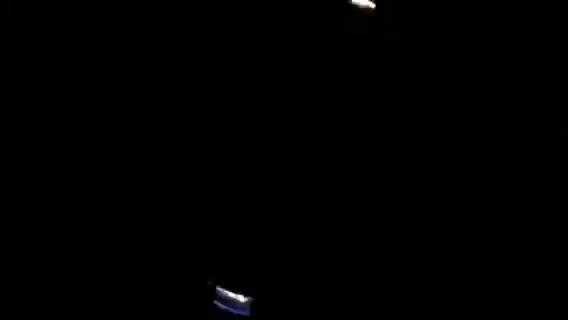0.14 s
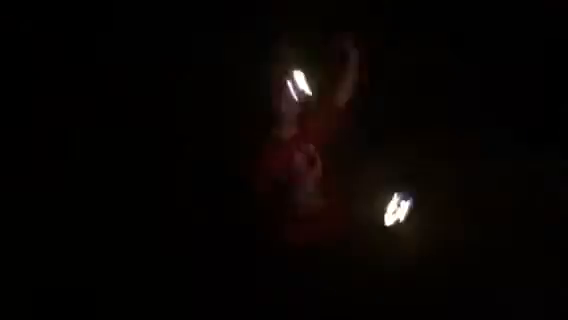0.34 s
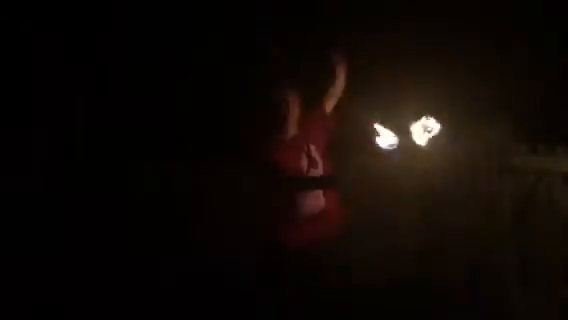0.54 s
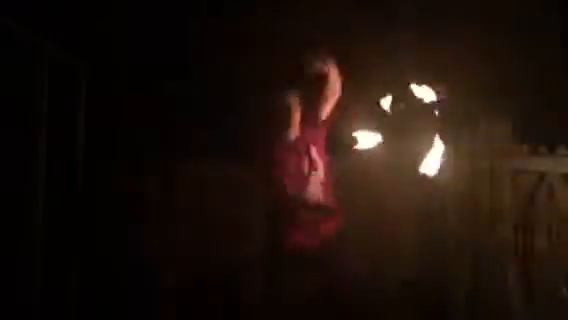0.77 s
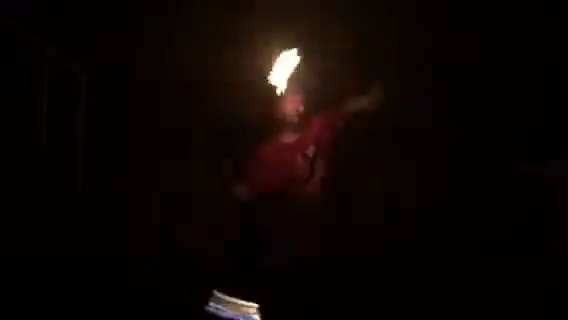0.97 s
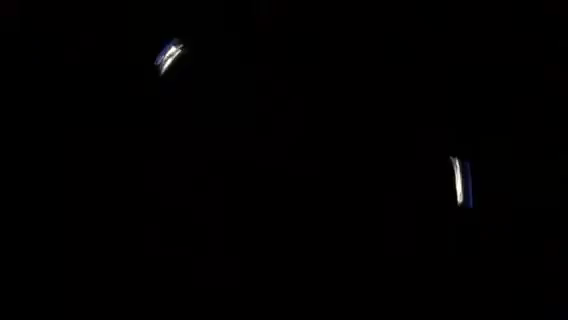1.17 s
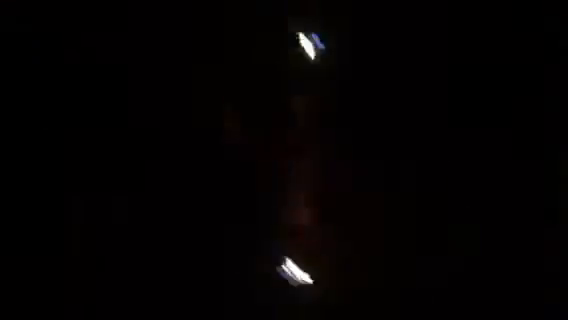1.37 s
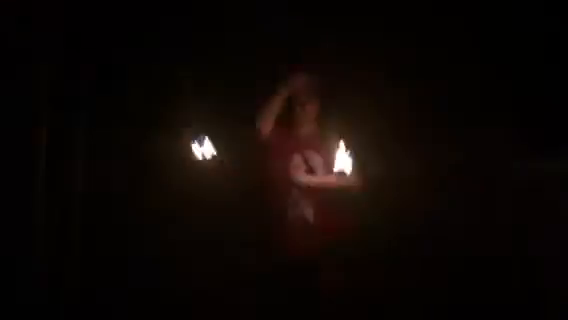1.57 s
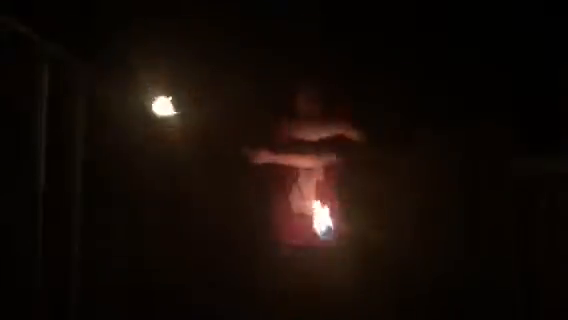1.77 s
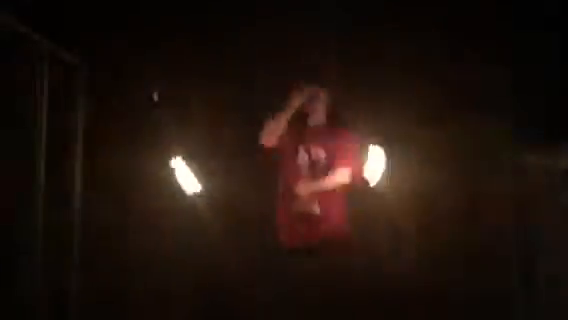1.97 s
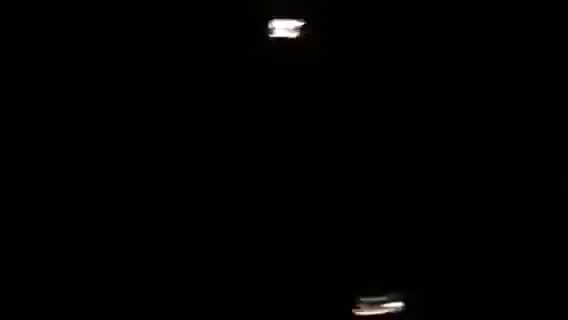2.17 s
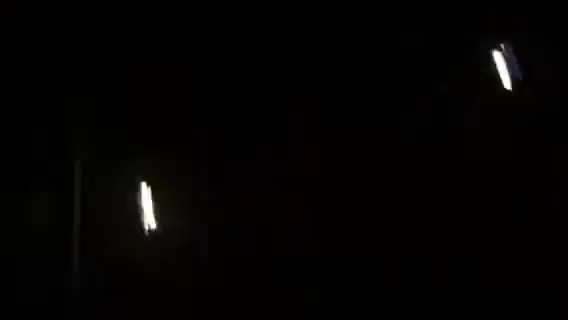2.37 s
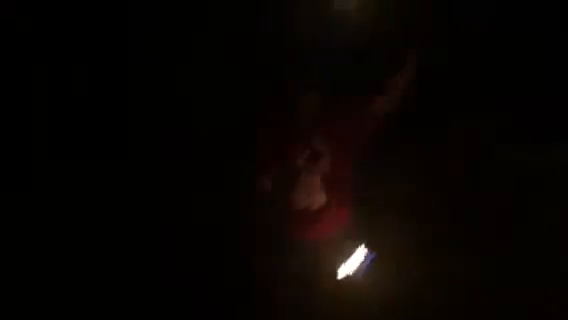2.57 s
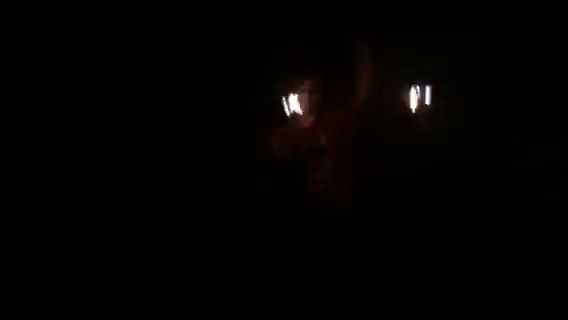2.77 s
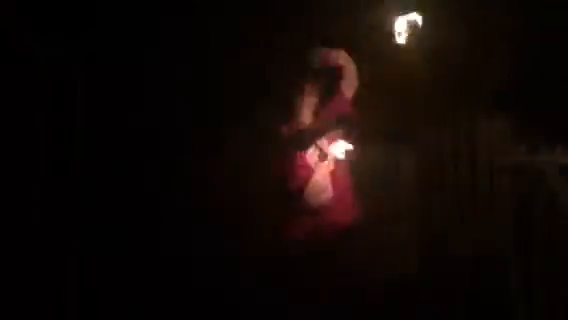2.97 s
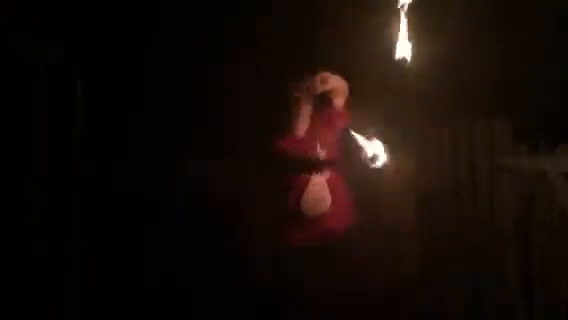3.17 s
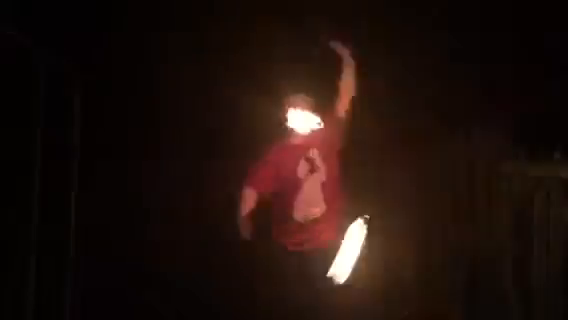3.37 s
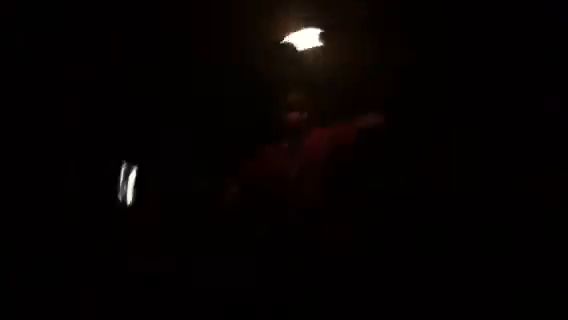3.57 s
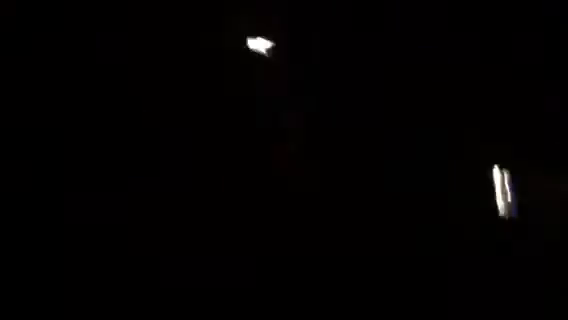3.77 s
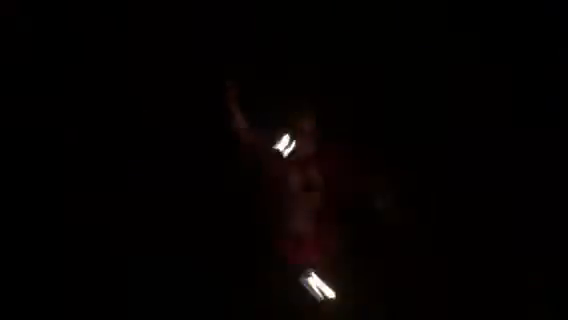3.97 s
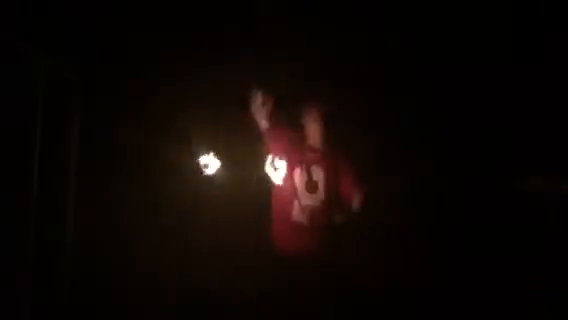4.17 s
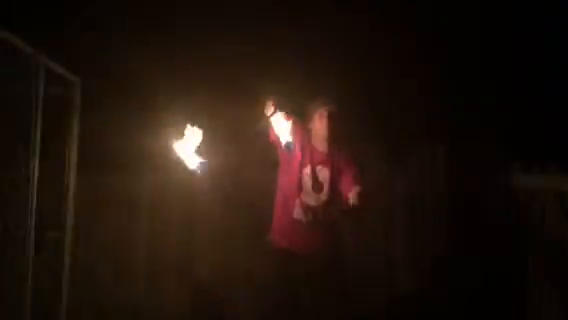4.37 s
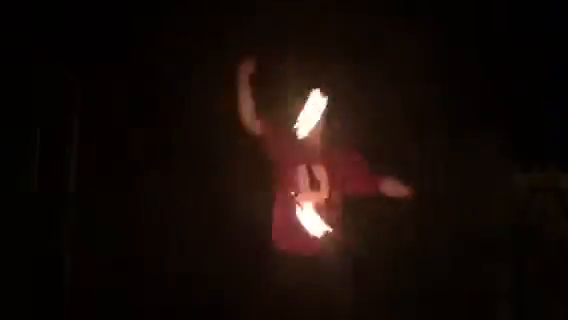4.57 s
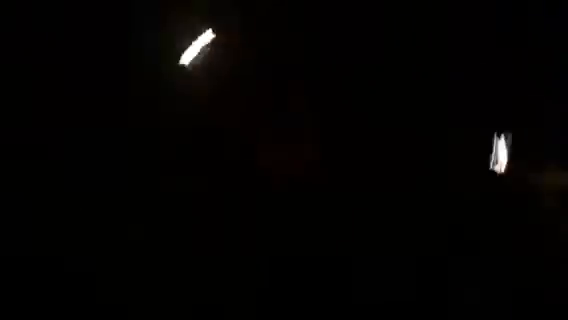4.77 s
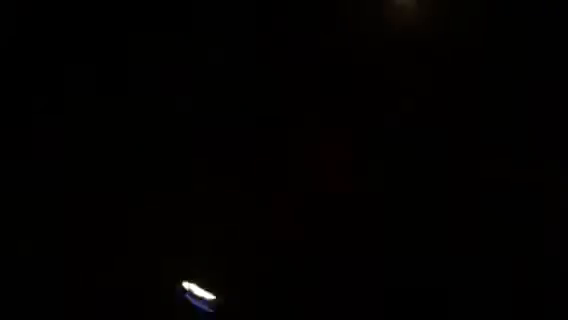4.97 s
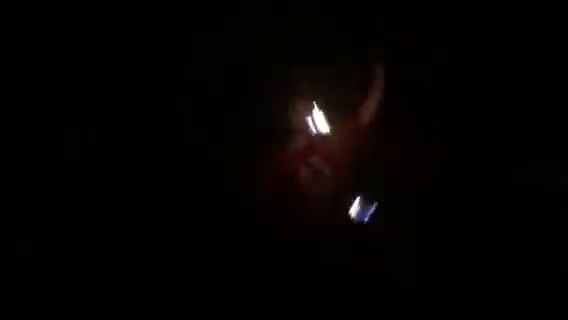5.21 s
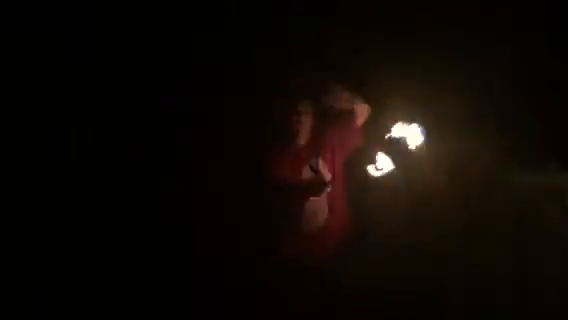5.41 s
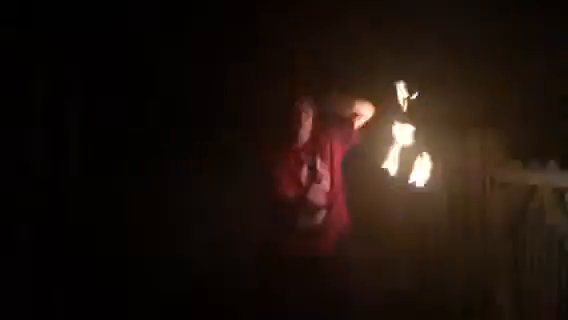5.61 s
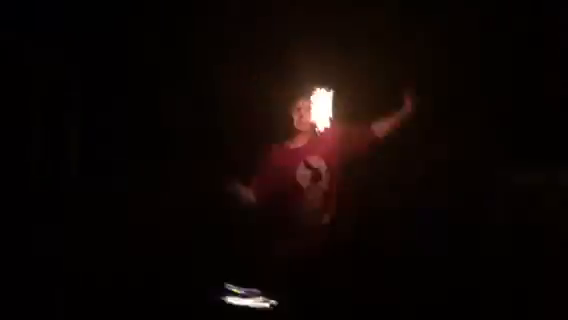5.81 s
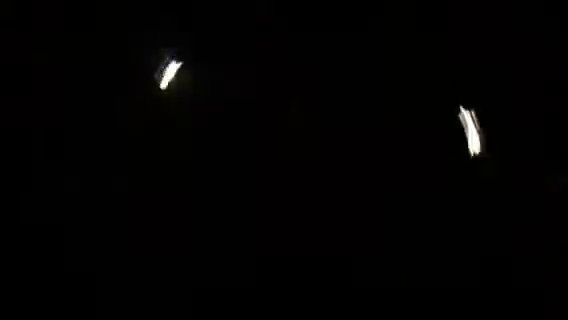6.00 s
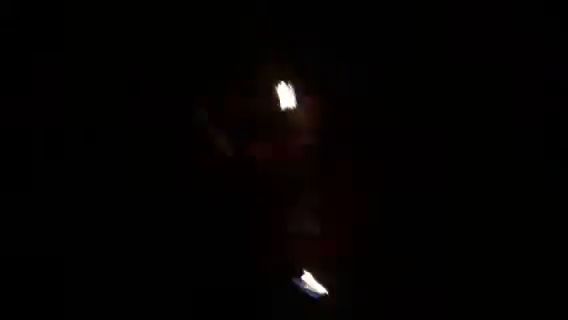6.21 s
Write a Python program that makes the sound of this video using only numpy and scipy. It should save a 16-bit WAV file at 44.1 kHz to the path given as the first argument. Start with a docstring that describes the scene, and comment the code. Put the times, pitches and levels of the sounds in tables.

```python
"""Two burning wicks on chains are swung through still night air a few steps from a small microphone.
The torn flames roar louder in each swing while their brightness keeps shifting; slow flames flutter and
puff. The ground throws each roar back a few milliseconds late, and as this delay wanders it sweeps a hollow
colour through it. Big swirls of air thump, chain links tick and chink, and a swivel squeaks once."""
import sys
import numpy as np
from scipy import signal
from scipy.fft import rfft, irfft
from scipy.io import wavfile
from scipy.ndimage import uniform_filter1d

SR = 44100
rng = np.random.default_rng(int(sys.argv[2]) if len(sys.argv) > 2 else 0)


def wrap_up_sound(samples):
    """Save the sound to the file named by the first command line argument, as 16-bit audio."""
    columns = np.atleast_2d(samples).T
    # keep every value between -1 and 1, then stretch to whole-number steps
    tamed = np.clip(columns, -1, 1)
    steps = np.round(tamed * 32767).astype(np.int16)
    wavfile.write(sys.argv[1], SR, steps)


N = 275533


def gain_of(db):
    """Turn decibels into a factor to multiply by."""
    return 10 ** (np.asarray(db) / 20)


def evened(x):
    """Scale x to an average size (rms) of 1."""
    return x / np.sqrt(np.mean(x ** 2) + 1e-20)


def level_at(points, hz):
    """Read a curve of levels at the frequencies hz."""
    f, db = np.transpose(points)
    return np.interp(np.log(hz + 1), np.log(f + 1), db)


def add(mix, s, sound):
    """Mix a sound in, starting at s seconds."""
    part = mix[round(s * SR):][:len(sound)]
    part += sound[:len(part)]


def grid(size):
    """Frequencies (column) and times (row) of sound cut into frames of size samples."""
    return np.fft.rfftfreq(size, 1 / SR)[:, None], np.arange(4 * N // size + 5) * size / 4 / SR


def blotches(size, bins, frames):
    """Random patches on the grid, smooth over some frequency bins and time frames."""
    hz, t = grid(size)
    raw = rng.standard_normal((len(t), len(hz))).T
    return evened(uniform_filter1d(uniform_filter1d(raw, bins, 0), frames, 1))


def noise(gain, size):
    """Noise whose strength follows gain at each point of the grid."""
    real, imag = rng.standard_normal(gain.shape[::-1] + (2,)).T
    return signal.istft(gain * (real + 1j * imag), nperseg=size, noverlap=3 * size // 4)[1][:N]


def shaped(points, hz, band_hz=(0, SR)):
    """Gains along a curve, scaled so the power within the band sums to 1."""
    gain = gain_of(level_at(points, hz))
    in_band = (hz > band_hz[0]) & (hz < band_hz[1])
    return gain / np.sqrt(np.sum(gain[in_band] ** 2))


def wander(per_s, t):
    """A smooth random drift that swings up to per_s times a second."""
    rates = np.geomspace(per_s / 8, per_s, num=16)[:, None]
    waves = np.sin(2 * np.pi * (rates * t + rng.random(rates.shape)))
    return evened(np.sum(waves / np.sqrt(rates), axis=0))


def swell(length):
    """Times and loudness of a quick rise and slower fall, lasting four times length."""
    t = np.arange(round(4 * length * SR)) / SR
    return t, 1.77 * t / length * np.exp(1 - 2.62 * t / length)


def flicker(per_s):
    """The flame tears and heals at random, from 3 to about per_s times a second."""
    band = signal.butter(2, [3, per_s], "bandpass", fs=SR, output="sos")
    return evened(signal.sosfilt(band, rng.standard_normal(N)))


def flame_db(quality, t):
    """How strong one quality of the flame is at times t, as swings and lulls take turns."""
    # the fast flame, one list a swing: t/s, roar/dB, brightness/dB, hum/dB, hiss/dB (all relative)
    swings = [
        [(0.0, -49, -3.5, -4, -60), (0.026, -43.5, -3.5, 3.5, -60.5), (0.204, -56.5, 0, 1.5, -66),
         (0.244, -56.5, 0.5, 5, -66), (0.32, -50.5, -6, -4, -83), (0.35, -45.5, -7, -2, -83),
         (0.414, -58, -3.5, 6.5, -80), (0.444, -53, -11, 1, -87), (0.46, -52, -8.5, 6, -72),
         (0.57, -61, -11.5, 2, -85)],
        [(0.88, -63, -7.5, -5, -73), (0.936, -47.5, -9, -6, -64), (1.096, -46.5, -4.5, 2.5, -61),
         (1.118, -50, -1, 6, -65.5), (1.396, -50.5, -5.5, -2, -65.5), (1.476, -56, -4, 9, -70),
         (1.588, -42.5, -14, -13, -74), (1.644, -58, -4.5, 8, -75), (1.846, -60, -11.5, 3, -82),
         (1.89, -64, -18, -18, -90)],
        [(2.08, -62, -7, 3.5, -78), (2.202, -45, -7, -2, -65), (2.252, -50, -3, 7.5, -61.5),
         (2.394, -50, -3, 2, -61), (2.55, -47, -7, -11, -64), (2.684, -56, -3, 11.5, -71.5),
         (2.734, -49.5, -10, -6, -77), (2.906, -64, -2, 20.5, -71), (2.962, -67.5, -1.5, 19.5, -62.5),
         (3.04, -54.5, -14, -3.5, -65)],
        [(3.42, -51, -10, 1, -79), (3.442, -46.5, -10.5, -2, -67.5), (3.53, -51, -1.5, 2, -63),
         (3.562, -43.5, -5.5, 0.5, -57.5), (3.598, -57, 3, 10, -64), (3.786, -49, -7, 5.5, -76),
         (3.906, -53, -2.5, -1.5, -64), (4.068, -52, -5, 5.5, -70.5), (4.17, -48, -10, -7, -72.5),
         (4.25, -53.5, -19, -10, -79)],
        [(4.6, -60.5, -6.5, -2, -90), (4.656, -48, -6, 6, -69), (4.768, -47.5, -5, 3.5, -58.5),
         (4.976, -54.5, -0.5, 5.5, -64.5), (4.996, -43.5, -10, -5, -71), (5.052, -55.5, -2.5, -2.5, -76),
         (5.252, -48.5, -11, -1, -74), (5.334, -53, -9, -9, -80), (5.382, -48, -10.5, -2.5, -71),
         (5.44, -69, -3, 13.5, -77)],
        [(5.78, -64, -6, -11, -86), (5.818, -55, 0, 10, -79), (5.888, -50.5, -5.5, 0, -68),
         (5.922, -54, -1, 10, -63.5), (5.946, -41.5, -7.5, 1, -61.5), (5.99, -55, 1.5, 11.5, -65),
         (6.054, -46.5, -6, 3.5, -68.5), (6.17, -52.5, -3, 3.5, -66), (6.222, -55.5, 0.5, 7, -64),
         (6.248, -50, -11, 4, -67)],
    ]
    # the slow flame between swings: same columns
    lulls = [
        [(0.6, -74.5, 0, 14, -89), (0.72, -65.5, -9, -13, -85), (0.74, -79, -1, 11, -90),
         (0.86, -83, 1, -9, -71)],
        [(1.92, -76, 1, 10, -92), (1.938, -70, -17, -11, -86), (1.99, -88.5, 8, 30.5, -89),
         (2.05, -62.5, -10, 3, -89)],
        [(3.06, -85, 1, -5, -67), (3.076, -80.5, 3.5, 25, -67.5), (3.31, -79, -3, 11.5, -81),
         (3.4, -60, -3.5, 2, -82)],
        [(4.27, -80, -2, 4, -77), (4.382, -65, -12, 0, -84), (4.406, -80, -5, 5, -91), (4.58, -91, 2, 4, -91)],
        [(5.47, -82, 4.5, 22, -84), (5.496, -72, -1.5, 3, -91), (5.708, -85, 3, 9, -91),
         (5.76, -80, 5, -7, -90)],
    ]
    rows = np.array(sorted(row for curve in swings + lulls for row in curve))
    column = 1 + ["roar", "brightness", "hum", "hiss"].index(quality)
    return np.interp(t, rows[:, 0], rows[:, column])


def roar(tearing):
    """A torn flame roars louder in each swing, shifting in brightness; swirls behind the wick hum."""
    # tone colour of the torn flame: f/Hz, level/dB
    colour = [(71, -11), (120, -9.5), (173, -5), (275, -3.5), (495, -7.5), (571, -6), (1010, -10),
              (1450, -20), (1740, -20.5), (2400, -26.5), (12100, -56), (15200, -80)]
    plain_bright_db, plain_hum_db = -7, -2.5  # these values leave the colour as it is
    hz, t = grid(size=1024)
    treble_weight = np.clip(np.log2((hz + 1) / 500) / 0.98, 0, 1.6)
    tilt_db = (flame_db("brightness", t) - plain_bright_db) * treble_weight
    hum_hz, half_width_hz = 301 + 30 * wander(13, t), 156
    hum_db = 0.98 * (flame_db("hum", t) - plain_hum_db) / (1 + ((hz - hum_hz) / half_width_hz) ** 2)
    # random patches make the noise grainy and faintly warbling
    speckle_db = 3.0 * blotches(1024, bins=2, frames=6) + 2.1 * blotches(1024, bins=9, frames=14)
    gain = shaped(colour, hz, band_hz=(450, 900)) * gain_of(tilt_db + hum_db + speckle_db)
    level_db = flame_db("roar", np.arange(N) / SR) - 5 + 1.26 * tearing
    return noise(gain, size=1024) * gain_of(level_db)


def with_ground_echo(sound):
    """The soil returns a duller copy; its delay drifts at random, as if the wick rose and fell."""
    echo_gain, cutoff_hz = .62, 2200
    t = np.arange(N) / SR
    dull = signal.filtfilt(*signal.butter(1, cutoff_hz, fs=SR), sound)
    late_ms = 3.0 + .55 * wander(7, t)
    return sound + echo_gain * np.interp(t - late_ms / 1000, t, dull)


def hiss(tearing):
    """Air rushing past the wick hisses and flickers with the flame."""
    # tone colour of the rushing air: f/Hz, level/dB
    colour = [(1760, -23), (3000, -2.5), (3550, -4), (3800, -4), (5160, -12), (6370, -11.5), (15200, -22)]
    usual_db = -9  # hiss against the treble of the roar
    hz, t = grid(size=512)
    speckle_db = 1.6 * blotches(512, bins=28, frames=12) + 2.6 * blotches(512, bins=2, frames=6)
    # a hiss that stands out over a weak roar is thinner
    excess_db = flame_db("hiss", t) - flame_db("roar", t) - flame_db("brightness", t) - usual_db
    thin_db = 0.17 * np.clip(excess_db, 0, 16) * np.log2((hz + 1) / 6000)
    gain = shaped(colour, hz, band_hz=(4000, 15000)) * gain_of(speckle_db + thin_db)
    level_db = flame_db("hiss", np.arange(N) / SR) - 5 + 0.81 * tearing + 0.53 * flicker(77)
    return noise(gain, size=512) * gain_of(level_db)


def flutter():
    """The whole body of the flame flaps, making a lumpy bass."""
    # tone colour of large slow swirls: f/Hz, level/dB
    colour = [(13, -39), (22, -7), (42, -12), (64, 1.5), (114, 2), (166, -15.5), (200, -5), (260, -71),
              (440, -120)]
    # how hard the flames flap: t/s, level/dB
    flapping = [(0.0, -45), (0.05, -40.5), (0.1, -50), (0.9, -60), (1.02, -48), (1.09, -51), (2.05, -57.5),
                (2.21, -41), (2.33, -49.5), (3.29, -62.5), (3.58, -41), (3.79, -61), (4.25, -54),
                (4.49, -66.5), (4.73, -44.5), (5.2, -61), (5.24, -47), (5.57, -64), (5.88, -48.5),
                (5.99, -41), (6.02, -49), (6.25, -54)]
    hz, t = grid(size=2048)
    gain = shaped(colour, hz) * np.ones(len(t))
    level_db = np.interp(np.arange(N) / SR, *np.transpose(flapping)) + 1.06 * flicker(20.3)
    return evened(noise(gain, size=2048)) * gain_of(level_db)


def night_air():
    """Still air and the microphone's own hiss make a faint, steady background."""
    # tone colour of the background: f/Hz, level/dB
    colour = [(88, -13), (150, -16), (229, -5.5), (379, -2), (558, -16.5), (731, -10.5), (1310, -15),
              (3780, -19.5), (4850, -23.5), (9010, -26.5), (15200, -31.5)]
    hz, _ = grid(size=1024)
    gain = gain_of(level_at(colour, hz) + 2.9 * blotches(1024, bins=2, frames=6))
    return gain_of(-69.5) * evened(noise(gain, size=1024))


def chain_ticks():
    """Steel links knock together: a gritty crack, its echo and a short, rattling ring."""
    # knocks: t/s, level/dB, link size (1 = usual), upper notes/dB, crack against ring/dB,
    # ring length (1 = usual)
    ticks = [(0.0104, -41, .98, -35, -32, 3.8), (0.091, -42, 1.13, -26, 1, 0.93),
             (.1236, -65, 1.0, 12, -5, .8), (.207, -65.5, 0.87, 13, -5, .9),
             (0.8125, -63.5, 1.15, 8, 5, .6), (.8172, -58, .97, -7, 8, .8), (.872, -66, 1, -3, 7, .8),
             (2.15, -68, 1.0, 10.5, 8, .9), (2.257, -56.5, 0.9, -11, 13, .9),
             (2.351, -45, 0.89, -13, 7, 0.41), (2.355, -39.5, 1.02, -22, -17, 0.45),
             (2.945, -76, 1.4, 7, -12, 2.5), (2.955, -75, .96, 14, -12, 3.0),
             (3.019, -76, 1.01, 8, -12, 1.8), (3.721, -53, 0.92, -12, -1, .8),
             (4.154, -54, 0.88, -15, -10, 1.0), (4.8409, -53, 0.97, -25, -18, 3.1),
             (5.394, -58, 1.1, -16, -2, 1.3), (5.821, -62, 1.13, -14, -3, .9)]
    # the notes a link rings with: f/Hz, level/dB, fade time/s (to drop 60 dB)
    link_notes = [(3110, 0, 0.022), (6060, 2, 0.0062), (9230, -11.5, 0.038), (11400, -11, 0.014),
                  (12800, -1, .012)]
    echo_s, echo_db = .0045, -5
    cracks, rings, t = np.zeros(N), np.zeros(N), np.arange(3000) / SR
    for s, db, size, treble_db, crack_db, length in ticks:
        grit = rng.standard_normal(len(t))
        add(cracks, s, gain_of(db + crack_db) * grit * np.exp(-t / 0.0011))
        ring = np.zeros(len(t))
        for k, (hz, note_db, fade_s) in enumerate(link_notes):
            fading = gain_of(note_db + (k > 0) * treble_db - 60 * t / (fade_s * length))
            ring += fading * np.sin(2 * np.pi * min(hz / size, 15000) * t)
        rattle = .6 + .8 * evened(uniform_filter1d(grit[::-1], size=30))
        onset = np.minimum(t / 0.0005, 1)
        add(rings, s, gain_of(db) * rattle * ring * onset)
    cracks = signal.sosfilt(signal.butter(1, [2300, 6000], "bandpass", fs=SR, output="sos"), cracks)
    dull_echo = uniform_filter1d(np.roll(cracks, round(echo_s * SR)), size=5)
    return rings + cracks + gain_of(echo_db) * dull_echo


def thumps():
    """A big swirl of air pushes out a few slow, deep waves."""
    # big swirls: t/s, level/dB, f/Hz, swell length/s
    swirls = [(0.025, -31.5, 68.6, 0.029), (1.001, -32.5, 62.5, 0.039), (2.189, -40, 80.7, 0.078),
              (3.56, -38, 63, 0.034), (4.717, -42, 56.6, 0.084), (5.952, -36, 60.4, 0.045)]
    out = np.zeros(N)
    for s, db, hz, length in swirls:
        t, shape = swell(length)
        add(out, s, gain_of(db) * shape * np.sin(2 * np.pi * (hz * t + rng.random())))
    return out


def puffs():
    """A pocket of fuel vapour catches all at once: a short hollow note in a breath of dull noise."""
    # pockets of vapour: t/s, level/dB, f/Hz, swell length/s (capped below), breath against note/dB
    pockets = [(0.707, -50.5, 737, 0.0087, -10), (0.887, -56, 373, 0.043, -18),
               (0.923, -45, 374, 0.038, -18), (1.855, -51.5, 576, 0.015, -11), (2.049, -53, 777, 0.016, -8),
               (2.737, -55, 272, 0.044, -1), (2.759, -57.5, 1700, .03, 6), (3.367, -44.5, 379, 0.018, -3),
               (3.437, -41, 392, 0.016, -10.5), (4.303, -54.5, 327, 0.012, -6),
               (4.366, -51, 410, 0.011, -19), (4.589, -58, 275, 0.054, -1), (5.135, -47.5, 308, 0.017, -1),
               (5.239, -56, 287, 0.011, -11), (5.305, -39.5, 328, 0.016, -14),
               (5.438, -62, 1710, 0.023, -22), (5.78, -48.5, 365, 0.026, -5.5),
               (5.801, -41.5, 383, 0.034, -31)]
    out = np.zeros(N)
    band = signal.butter(3, [250, 1250], "bandpass", fs=SR, output="sos")
    for s, db, hz, length, breath_db in pockets:
        grit = rng.standard_normal(8000)
        t, shape = swell(min(length, .04))
        breath = evened(signal.sosfilt(band, grit))[:len(t)]
        drift = 0.018 * np.cumsum(uniform_filter1d(grit, size=200)[:len(t)])  # the pitch wobbles
        note = np.sin(2 * np.pi * hz * t + drift)
        add(out, s, gain_of(db) * shape * (note + gain_of(breath_db) * breath))
    return out


def swivel_squeak():
    """A swivel rubs under load: a thin tone that stutters and climbs a little."""
    start_s, length_s, pitch_hz, rise_hz, level_db = 4.835, .065, 3512, 50, -63
    out, t = np.zeros(N), np.arange(0, length_s, 1 / SR)
    stutter = 1 + .4 * evened(uniform_filter1d(rng.standard_normal(len(t)), size=120))
    tone = np.sqrt(2) * np.sin(2 * np.pi * np.cumsum(pitch_hz + rise_hz * t / t[-1]) / SR)
    add(out, start_s, gain_of(level_db) * stutter * tone * signal.windows.tukey(len(t), .3))
    return out


def scene():
    """Both wicks follow the same swings, but each flickers in its own way."""
    tearing = flicker(16.6)
    louder_wick = with_ground_echo(roar(tearing) + puffs())
    softer_wick = gain_of(-4) * with_ground_echo(roar(flicker(36)))
    bass = flutter() + thumps()
    flames = louder_wick + softer_wick + bass + hiss(tearing)
    return (flames + chain_ticks() + swivel_squeak() + night_air())[None]


def record(dry):
    """The microphone loses deep bass and top treble; its opening dips one narrow band."""
    # the dip made by the opening: f/Hz, half width/Hz, level/dB
    port_dip = (10430, 190, -5.5)
    dip_hz, half_width_hz, dip_db = port_dip
    lowest_hz, highest_hz = 45, 15320
    hz = np.fft.rfftfreq(N, 1 / SR)
    dip = gain_of(dip_db / (1 + ((hz - dip_hz) / half_width_hz) ** 2))
    bass_cut = 1 / np.sqrt(1 + (lowest_hz / (hz + 1)) ** 8)
    heard = irfft(rfft(dry) * dip * bass_cut, N)
    treble_cut = signal.firwin(1023, highest_hz, window=("kaiser", 9), fs=SR)
    electronic_noise = gain_of(-101) * rng.standard_normal(dry.shape)
    return signal.oaconvolve(heard, treble_cut[None], "same") + electronic_noise


dry = scene()
out = record(dry)
wrap_up_sound(out)
```